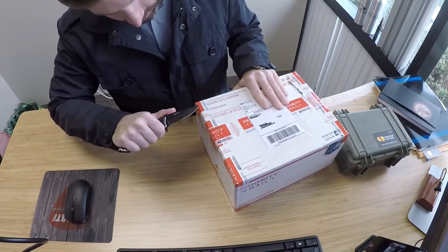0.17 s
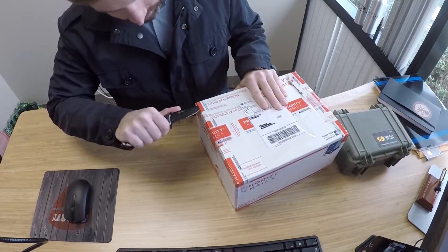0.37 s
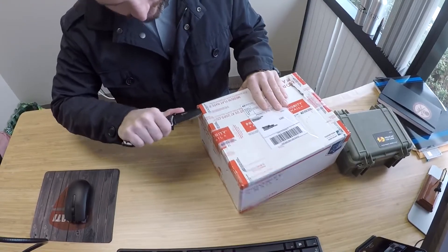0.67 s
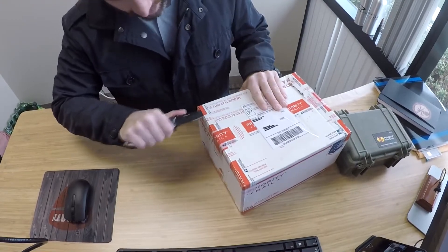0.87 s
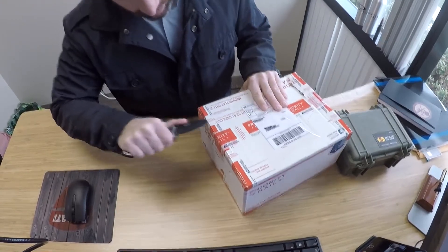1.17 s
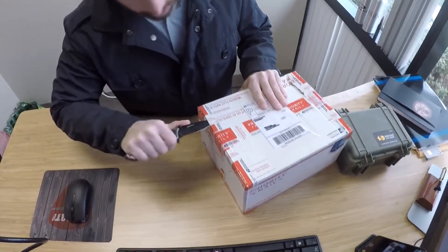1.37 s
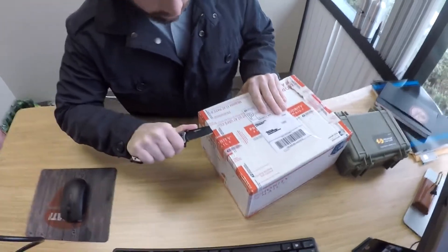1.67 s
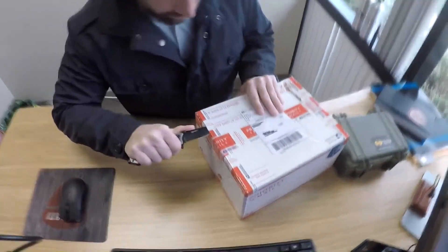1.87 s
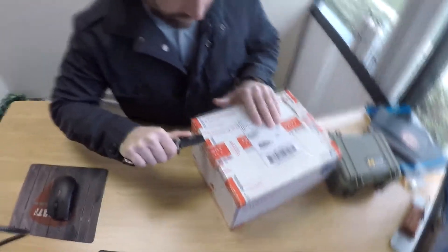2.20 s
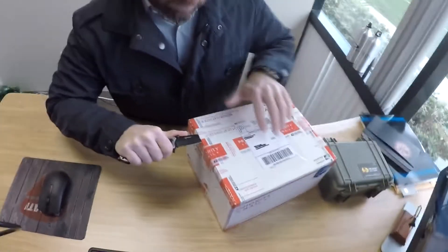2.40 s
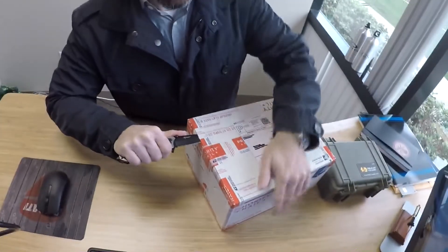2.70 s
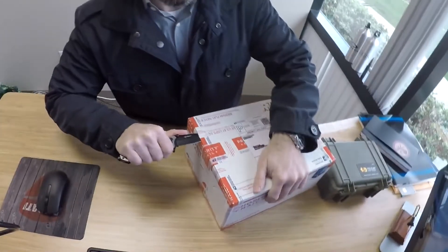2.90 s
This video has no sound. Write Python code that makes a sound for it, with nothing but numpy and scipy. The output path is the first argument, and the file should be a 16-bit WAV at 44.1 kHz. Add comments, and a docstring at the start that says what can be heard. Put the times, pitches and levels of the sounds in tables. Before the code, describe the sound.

Close up on a desk in a small room, tape ticks and rasps under a blade, cardboard creaks and thuds, the hardest knock comes late, then quieter handling and one last stroke.

```python
"""A small office, two microphones close by on the wooden desk where a knife cuts a taped cardboard box.
The tape ticks, then short strokes rasp through it: noise made of fibre snaps, shaped by the blade's speed.
The blade binds: stick-slip pulses creak, the box chatters and slides, and blows ring the desk modes.
The hardest knock comes as the hand lets go to shift its grip; the lid drums low, and a last stroke follows.
Desk-borne knocks and rumble shake the two microphones in nearly opposite senses, over a steady noise floor."""
import sys
import numpy as np
from scipy import signal
from scipy.fft import rfft, irfft, next_fast_len
from scipy.io import wavfile
from scipy.ndimage import uniform_filter1d, minimum_filter1d

SR = 44100
rng = np.random.default_rng(int(sys.argv[2]) if len(sys.argv) > 2 else 0)


def pcm_store(signal):
    """Save signal as 16-bit PCM."""
    levels = np.round(np.clip(np.atleast_2d(signal), -1, 1) * 32767)
    wavfile.write(sys.argv[1], SR, levels.astype(np.int16).T)


N = 134505
TIME = np.arange(N) / SR
SIZE = next_fast_len(N + SR // 2)  # padded length, with room for filter tails
FREQ = np.fft.rfftfreq(SIZE, 1 / SR)

# knife strokes; the last column is the dull cardboard scrape relative to the rasp:
# start_s [s], length_s [s], level_db [dB], scrape_db [dB]
STROKES = [(0.226, 0.13, -46.5, 9.5), (0.291, 0.27, -46.5, 8), (0.573, 0.18, -62, 18),
           (0.646, 0.18, -37, 2.5), (0.823, 0.21, -44.5, 9), (0.93, 0.12, -36.5, 0.5),
           (1.082, 0.1, -47.5, 7.5), (1.147, 0.15, -36, 5), (1.271, 0.19, -51.5, 10),
           (1.368, 0.12, -32.5, 2), (1.49, 0.13, -57, 10.5), (1.558, 0.24, -47, 4.5),
           (1.847, 0.093, -47.5, 8.5), (2.89, 0.17, -46.5, 2.5)]
# spectrum of the blade in the tape: pitch_hz [Hz], level_db [dB]
RASP_SPECTRUM = [(300, -20), (1500, 1), (2700, 1.5), (3800, 1.5), (4900, -0.5), (6300, 9), (7600, 8),
                 (8300, 1), (10000, -1.5), (11500, -11.5), (13800, -7.5), (15000, -36)]
# spectrum of the blade on the cardboard beneath: pitch_hz [Hz], level_db [dB]
SCRAPE_SPECTRUM = [(100, 4), (350, 5.5), (920, -6.5), (1300, -0.5), (1700, -9), (2200, -11), (3800, -11.5),
                   (15000, -43.5)]
# likeness of airborne sound at the two microphones: pitch_hz [Hz], likeness [0 to 1]
AIR_LIKENESS = [(2500, 0.16), (3000, 0.78), (4400, 0.81), (5000, 0.28), (7000, 1), (9500, 0.084),
                (11500, 0.9), (13500, 0.97)]
# phase lag of the right microphone in the air: pitch_hz [Hz], lag_rad [rad]
AIR_PHASE = [(800, 4), (1400, 2.05), (2600, -2.5), (7300, 1), (9000, 3.5), (11500, 6.1)]
# ticks of the taut tape: start_s [s], level_db [dB], lowest_hz [Hz], highest_hz [Hz]
SNAPS = [(.0925, -29, 695, 5370), (.218, -42, 2400, 7600), (.582, -34, 2320, 3620),
         (1.845, -44, 1600, 8000), (2.522, -43.5, 1300, 7000), (2.758, -51, 900, 5000),
         (2.771, -41, 700, 4450)]
# creaks of the cardboard; crispness is the airborne part relative to the desk-borne part:
# start_s [s], length_s [s], level_db [dB], crispness_db [dB]
CREAKS = [(1.549, 0.019, -30, -21), (1.615, 0.033, -28, -19.5), (1.742, 0.061, -33, -18),
          (1.843, 0.019, -25.5, -17), (1.874, 0.044, -30.5, -16), (2.004, 0.036, -40.5, -22),
          (2.089, 0.057, -33.5, -17.5), (2.303, 0.02, -34.5, -19.5), (2.471, 0.018, -43, -23),
          (2.522, 0.016, -37.5, -16), (2.869, 0.034, -33.5, -16.5), (3.04, 0.034, -33.5, -17.5)]
# spectrum of creak and rub through the desk: pitch_hz [Hz], level_db [dB]
CREAK_BODY = [(200, -10.5), (550, -17.5), (850, 13.5), (1100, 13.5), (1500, 16), (1750, -1.5), (2150, 6.5),
              (2500, -8.5), (6000, -66)]
# spectrum of the creak through the air: pitch_hz [Hz], level_db [dB]
CREAK_CRISP = [(600, -20), (1500, -4.5), (2300, -5), (3400, 1), (4100, -20), (5200, -20), (6800, -12.5),
               (12000, -52.5)]
# dull thuds of the box on the desk: start_s [s], level_db [dB], spot_hz [Hz], low_modes_db [dB]
THUDS = [(0.468, -26, 283, 10.5), (.528, -23, 305, 8), (.584, -30, 326, 13.5), (.763, -24, 796, -5),
         (0.879, -34, 302, 14), (.937, -30.5, 487, 17.5), (1.096, -35, 510, -1), (1.158, -35.5, 444, 16),
         (1.44, -17.5, 560, -8), (1.622, -24.5, 447, 7.5), (1.784, -19, 543, 5), (1.957, -19, 390, 3),
         (2.063, -20, 304, 5.5), (2.2, -9.5, 281, -4), (2.759, -27.5, 303, -1.5), (2.771, -26, 353, -20),
         (2.865, -24.5, 330, -2.5)]
# clacks as the blade jolts free and hits the box:
# start_s [s], level_db [dB], spot_hz [Hz], hardness_hz [Hz], low_modes_db [dB]
CLACKS = [(1.475, -19, 1097, 1200, 4.5), (1.7059, -21.5, 1034, 1500, 3.5), (1.913, -11, 993, 2150, -3.5),
          (2.137, -13.5, 991, 2100, 8.5)]
# low modes of box and desk: pitch_hz [Hz], level_db [dB], t60_s [s]
LOW_MODES = [(73.8, 4.5, 0.066), (131, 1.5, 0.14), (172.1, 3, 0.1)]
# upper modes of box and desk: pitch_hz [Hz], level_db [dB], t60_s [s]
HIGH_MODES = [(273, -9, 0.34), (396.5, -9, 0.32), (489.4, -6, 0.16), (635, -25, 0.12), (733, -13, 0.22),
              (876, 4, 0.028), (1170, -12, 0.15), (1387, -3, 0.074), (1820, -12, .025), (2035, 0.5, 0.025)]
# chatter of the box under the push:
# start_s [s], length_s [s], level_db [dB], first_rate_hz [Hz], last_rate_hz [Hz]
CHATTERS = [(0.678, 0.22, -14, 114.3, 81.3), (0.93, 0.17, -11, 145.6, 101.1), (1.227, 0.14, -11, 88.5, 105),
            (2.057, 0.19, -15.5, 136, 172.5)]
# drumming of the lid as the hand lets go: start_s [s], length_s [s], level_db [dB]
DRUMS = [(2.204, 0.11, -17), (2.345, 0.108, -19)]
# gritty slide of the box between knocks: time_s [s], level_db [dB]
RUB = [(1.35, -67), (1.55, -42.5), (1.9, -41.5), (1.97, -46.5), (2.18, -38.5), (2.42, -77), (2.7, -72),
       (2.92, -66)]
# desk rumble as the box is pushed about: time_s [s], bass_db [dB], boom_db [dB], low_middle_db [dB]
RUMBLE = [(.23, -26, -28.5, -41.5), (.31, -16.5, -23, -63), (.48, -20, -23, -38), (.66, -30.5, -25.5, -45),
          (.76, -17.5, -13.5, -32.5), (.86, -24, -31, -49), (1.091, -17, -15, -32.5),
          (1.3, -19, -24.5, -39), (1.5, -15, -20.5, -28), (1.59, -20.5, -22.5, -41),
          (1.637, -17, -20, -33.5), (1.85, -18, -21, -36.5), (2.029, -18, -31, -40),
          (2.27, -17.5, -22.5, -41.5), (2.47, -27, -44.5, -51), (2.68, -39.5, -47, -53.5),
          (2.772, -27.5, -30, -47.5), (2.84, -23, -41, -44), (2.89, -22, -27.5, -51),
          (3.04, -42.5, -32.5, -45)]
# spectra of the three rumble layers: pitch_hz [Hz], level_db [dB]
BASS = [(10, -33.5), (25, -14), (42, -4.5), (65, 6), (85, -2), (120, -10), (300, -82)]
BOOM = [(40, -41.5), (75, -5), (95, 4), (115, -5.5), (150, -2), (185, -6), (240, -13.5), (500, -72.5)]
LOW_MIDDLE = [(130, -19.5), (230, -6.5), (280, 5), (350, -10), (405, -9.5), (450, -9), (530, -7),
              (700, -17), (1300, -17), (3000, -50.5)]
# left minus right level of desk vibration: pitch_hz [Hz], balance_db [dB]
DESK_BALANCE = [(30, -15), (70, -2.5), (140, -6.5), (270, 1), (600, 0)]
# spectrum of the steady background: pitch_hz [Hz], level_db [dB]
FLOOR_SPECTRUM = [(20, 9), (45, -12), (63, 12.5), (90, -35.5), (200, -23.5), (500, -33), (4800, -47.5),
                  (6800, -43), (8500, -51.5), (10500, -55.5), (13000, -77)]

# knife: one arch of speed per stroke (PEAK_AT under 1 peaks early), and light contact between strokes
ARCH, PEAK_AT = 2.35, 0.69
DRAG_DB, DRAG_UNTIL_S = -58.5, 1.72
FIBRES_PER_S, FIBRE_SPREAD_DB, SMOOTH_SHARE = 2600, 1.5, 0.6
JUDDER_DB, FLICKER_DB = 1.35, 1.5  # rms swings of the whole stroke and of each band
SNAP_DECAY_S = 0.0014
PING_AT_S, PING_HZ, PING_DB, PING_T60_S = 0.582, 2535, -44.5, 0.066
# creaks: typical slip rate and its scatter, fall in level along a creak, noisy ring of each slip
SLIPS_PER_S, SLIP_JITTER, SLIP_SPREAD_DB, CREAK_FADE_DB = 150, 0.4, 2.5, -7.5
SLIP_RING, SLIP_RING_S = 0.077, 0.0064
# blows: the struck spot dies by 60 dB in RING_CYCLES; thud hardness is a multiple of its spot pitch
THUD_RING_DB, CLACK_RING_DB, RING_CYCLES = -8, 8.5, 47
THUD_HARDNESS = 1.19
DETUNE = 0.01  # rms share by which each mode shifts with the grip on the box
CLATTER_DB, CLATTER_S = -5, 0.008
RATTLE_DB, RATTLE_S, RATTLE_BAND_HZ = -11, 0.028, [330, 690]
CHATTER_WOBBLE, CHATTER_FALL_DB = 0.076, -15.5  # rms share of the rate; level step per harmonic
LID_HZ = 63.3
RUB_GRAINS_PER_S, RUB_SPREAD_DB = 450, 0.5
# rumble: unevenness of the push, and the part that the microphones do not share
LUMPS_DB, LUMPS_HZ, LOOSE_DB = 2.5, 36, -9.5
DESK_PHASE_RAD = 2.694
ROOM_DB, ROOM_T60_S = -6, 0.18
FLOOR_DB = -36.5
LIMIT, EDGE_HZ = 0.93, 14900  # peak held before the band limit; upper edge of the band


def knife():
    """Blade speed sets the level as tape fibres tear and the cardboard beneath is scraped."""
    rasp, scrape = np.zeros((2, N))
    for start, length, db, scrape_db in STROKES:
        progress = np.clip((TIME - start) / length, 0, 1)
        speed = abs(np.sin(np.pi * progress ** PEAK_AT)) ** ARCH
        rasp += amp(db) * speed
        scrape += amp(db + scrape_db) * speed
    drag = amp(DRAG_DB) * uniform_filter1d(1.0 * (TIME < DRAG_UNTIL_S), size=2000)
    rasp, scrape = np.hypot(rasp, drag), np.hypot(scrape, drag)
    judder = amp(JUDDER_DB * wander(44))
    tape = colour(tearing(FIBRES_PER_S, FIBRE_SPREAD_DB) * rasp * judder, RASP_SPECTRUM)
    card = colour(tearing(FIBRES_PER_S, FIBRE_SPREAD_DB) * scrape * judder, SCRAPE_SPECTRUM)
    left, right = flicker(tape + card, count=16)
    return through_air(left, right)


def tearing(rate, spread_db):
    """Random fibre or grain snaps of uneven size over smooth friction noise, as two channels."""
    sizes = amp(spread_db * np.minimum(rng.exponential(1, N), 5))
    sizes = sizes * (rng.random(N) < rate / SR)
    grains = unit(sizes * rng.standard_normal((2, N)))
    smooth = SMOOTH_SHARE * rng.standard_normal((2, N))
    return unit(grains + smooth)


def flicker(x, count):
    """Overlapping bands each waver in level on their own as the tape gives."""
    place = np.minimum(FREQ / EDGE_HZ, 1) * (count - 1)
    out = np.zeros_like(x)
    for k in range(count):
        band = filtered(x, np.maximum(1 - abs(place - k), 0))
        out += band * amp(FLICKER_DB * wander(25))
    return out


def creaks():
    """The bound blade sticks and slips; returns the desk-borne and the crisp airborne part."""
    body, crisp = np.zeros((2, N))
    t = np.arange(SR // 50) / SR
    for start, length, db, crisp_db in CREAKS:
        gap, size = rng.standard_normal((2, 24))
        gaps = np.exp(SLIP_JITTER * gap) / SLIPS_PER_S
        for at, z in zip(np.cumsum(gaps) - gaps[0], size):
            if at >= length:
                continue
            ring = SLIP_RING * rng.standard_normal(len(t)) * np.exp(-t / SLIP_RING_S)
            slip = (t == 0) + ring
            # the first slip has no random spread
            level = amp(db + SLIP_SPREAD_DB * z * (at > 0) + CREAK_FADE_DB * at / length)
            slip = level * slip * np.sqrt(SR / SLIPS_PER_S / np.sum(slip ** 2))
            add(body, start + at, slip)
            add(crisp, start + at, amp(crisp_db) * slip)
    return colour(body, CREAK_BODY), colour(crisp, CREAK_CRISP)


def knocks():
    """Dull thuds of the box on the desk and harder clacks of the blade on the box."""
    out = np.zeros(N)
    for start, db, spot_hz, low_db in THUDS:
        add(out, start, amp(db) * blow(spot_hz, THUD_RING_DB, THUD_HARDNESS * spot_hz, low_db))
    for start, db, spot_hz, hard_hz, low_db in CLACKS:
        add(out, start, amp(db) * blow(spot_hz, CLACK_RING_DB, hard_hz, low_db))
    return out


def blow(spot_hz, ring_db, hard_hz, low_db):
    """One blow rings the struck spot and the modes of box and desk; soft blows lose the upper modes."""
    t = np.arange(SR // 3) / SR
    low, high = modes(LOW_MODES, t), modes(HIGH_MODES, t)
    spot = amp(ring_db - 60 * t * spot_hz / RING_CYCLES) * np.sin(2 * np.pi * spot_hz * t)
    clatter = amp(CLATTER_DB) * burst([600, 2200], CLATTER_S, t)
    rattle = amp(RATTLE_DB) * burst(RATTLE_BAND_HZ, RATTLE_S, t)  # loose cardboard walls
    struck = amp(low_db) * low + high + spot + clatter + rattle
    softness = signal.butter(5, min(hard_hz, SR / 4), fs=SR)
    return signal.lfilter(*softness, struck)


def modes(table, t):
    """Decaying sines, slightly detuned and alternating in sign from mode to mode."""
    out = np.zeros(len(t))
    for k, (hz, db, t60) in enumerate(table):
        shifted_hz = hz * (1 + DETUNE * rng.standard_normal())
        out += (-1) ** k * amp(db - 60 * t / t60) * np.sin(2 * np.pi * shifted_hz * t)
    return out


def burst(band_hz, decay_s, t):
    """Noise in one band that dies away exponentially."""
    band = signal.butter(2, band_hz, "band", fs=SR)
    return unit(signal.lfilter(*band, rng.standard_normal(len(t)))) * np.exp(-t / decay_s)


def chatter():
    """Nearly regular stick-slip of the box, with three harmonics, gliding as the push changes."""
    out = np.zeros(N)
    for start, length, db, first_hz, last_hz in CHATTERS:
        progress = np.clip((TIME - start) / length, 0, 1)
        rate_hz = first_hz + (last_hz - first_hz) * progress
        turns = np.cumsum(rate_hz * (1 + CHATTER_WOBBLE * wander(67))) / SR
        swell = amp(db) * np.sqrt(abs(np.sin(np.pi * progress)))
        for k in range(3):
            out += swell * amp(CHATTER_FALL_DB * k) * np.sin(2 * np.pi * (k + 1) * turns)
    return out


def lid():
    """The hollow box drums at one low note that swells and fades."""
    out = np.zeros(N)
    for start, length, db in DRUMS:
        t = np.arange(0, length, 1 / SR)
        swell = amp(db) * np.sin(np.pi * t / length)
        add(out, start, swell * np.sin(2 * np.pi * LID_HZ * t))
    return out


def snaps():
    """Single sharp ticks of the taut tape: band noise with a very fast decay."""
    out = np.zeros((2, N))
    t = np.arange(SR // 40) / SR
    for start, db, low_hz, high_hz in SNAPS:
        band = signal.butter(2, [low_hz, min(high_hz, SR / 3)], "band", fs=SR)
        gain = amp(db) * np.sqrt(SR / 2 / (high_hz - low_hz))  # makes up for the band's width
        for channel in out:
            tick = rng.standard_normal(len(t)) * np.exp(-t / SNAP_DECAY_S)
            add(channel, start, gain * signal.lfilter(*band, tick))
    return through_air(*out)


def ping():
    """The blade rings briefly at one pitch as it catches."""
    t = np.maximum(TIME - PING_AT_S, 0)
    return amp(PING_DB - 60 * t / PING_T60_S) * np.sin(2 * np.pi * PING_HZ * t)


def rub():
    """Gritty friction of the box bottom sliding on the wood."""
    level = amp(np.interp(TIME, *np.transpose(RUB)))
    return colour(tearing(RUB_GRAINS_PER_S, RUB_SPREAD_DB)[0] * level, CREAK_BODY)


def rumble():
    """The pushed box shakes the desk top in uneven lumps: three layers of low noise."""
    time_s, *levels = np.transpose(RUMBLE)
    lumps = amp(LUMPS_DB * wander(LUMPS_HZ))
    layers = np.zeros((3, N))
    for db, spectrum in zip(levels, (BASS, BOOM, LOW_MIDDLE)):
        noise = unit(colour(rng.standard_normal((3, N)) * lumps, spectrum))
        layers += amp(np.interp(TIME, time_s, db)) * noise
    shared, left, right = layers
    return through_desk(shared, DESK_PHASE_RAD) + amp(LOOSE_DB) * np.array([left, right])


def room(x):
    """A small office adds a short tail of decaying noise echoes, from 4 ms on."""
    t = np.arange(SR // 2) / SR
    tail = rng.standard_normal((2, len(t))) * amp(-60 * t / ROOM_T60_S) * (t > 0.004)
    return x + amp(ROOM_DB) * filtered(x, rfft(tail / np.linalg.norm(tail[0]), SIZE))


def background():
    """Steady coloured noise, partly shared by the two microphones."""
    shared, left, right = unit(colour(rng.standard_normal((3, N)), FLOOR_SPECTRUM))
    return amp(FLOOR_DB) * (shared + 0.87 * np.array([left, right]))


def through_air(a, b):
    """Two unrelated sounds become a partly alike microphone pair."""
    same = np.clip(read(AIR_LIKENESS), 0, 1)
    alike = filtered(a, same * np.exp(-1j * read(AIR_PHASE)))
    unlike = filtered(b, np.sqrt(1 - same ** 2))
    return np.array([a, alike + unlike])


def through_desk(x, phase):
    """Desk vibration reaches the two microphones with a fixed phase difference and a tilted balance."""
    lean = amp(read(DESK_BALANCE) / 2)
    return filtered(x, np.array([lean, np.exp(-1j * phase) / lean]))


def amp(db):
    """Decibels to gain."""
    return 10 ** (np.asarray(db) / 20)


def unit(x):
    """Scales to rms 1."""
    return x / np.sqrt(np.mean(x ** 2) + 1e-20)


def read(points):
    """A (Hz, value) table on the frequency grid, interpolated over log frequency."""
    f, value = np.transpose(points)
    return np.interp(np.log(FREQ + 1), np.log(f + 1), value)


def add(mix, s, sound):
    """Mixes a sound in at time s."""
    part = mix[max(round(s * SR), 0):][:len(sound)]
    part += sound[:len(part)]


def filtered(x, response):
    """Applies a frequency response."""
    return irfft(rfft(x, SIZE) * response, SIZE)[..., :N]


def colour(x, points):
    """Causal (minimum-phase) filter with the given spectrum; keeps the power of white noise."""
    gain = amp(read(points))
    cepstrum = irfft(np.log(unit(gain)), SIZE)
    cepstrum[1:SIZE // 2] *= 2
    cepstrum[SIZE // 2 + 1:] = 0
    return filtered(x, np.exp(rfft(cepstrum)))


def wander(rate):
    """Random drift of rms 1 with no motion faster than rate in Hz."""
    return unit(filtered(rng.standard_normal(N), FREQ < rate))


def scene():
    """Airborne cutting with its room tail, desk-borne knocks and rumble, and the background."""
    creak_body, creak_crisp = creaks()
    airborne = room(knife() + ping() + snaps() + creak_crisp)
    deskborne = through_desk(knocks() + creak_body + rub() + chatter(), DESK_PHASE_RAD)
    return airborne + deskborne + rumble() + lid() + background()


def record(dry):
    """A quick limiter, shared by both channels, holds the peaks; then the band limit."""
    gain = np.minimum(1, LIMIT / (abs(dry).max(0) + 1e-9))
    held = dry * uniform_filter1d(minimum_filter1d(gain, size=301), size=301)
    band_limit = signal.firwin(401, EDGE_HZ, window=("kaiser", 9), fs=SR)
    return signal.oaconvolve(held, band_limit[None], "same")


dry = scene()
out = record(dry)
pcm_store(out)
```